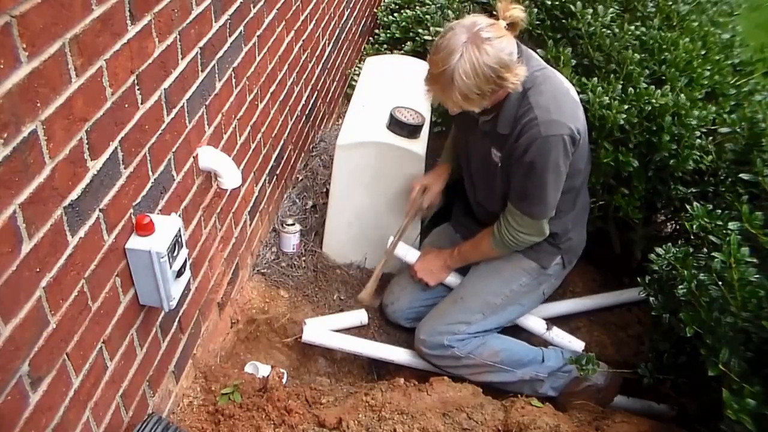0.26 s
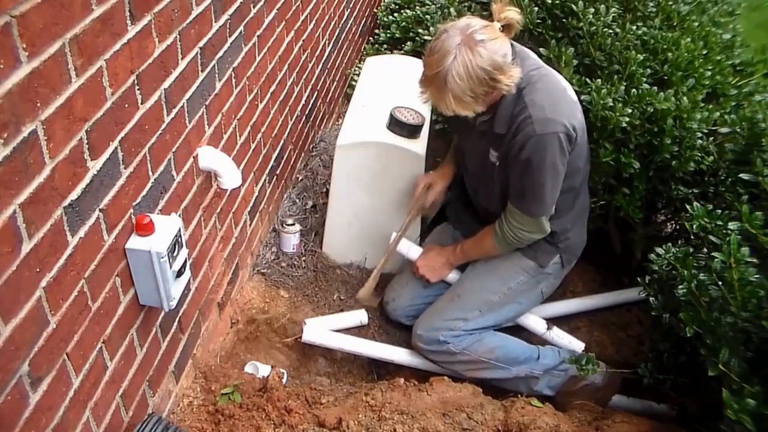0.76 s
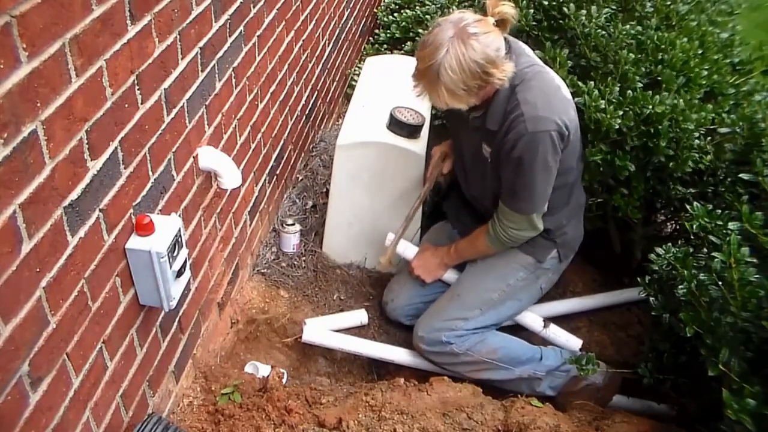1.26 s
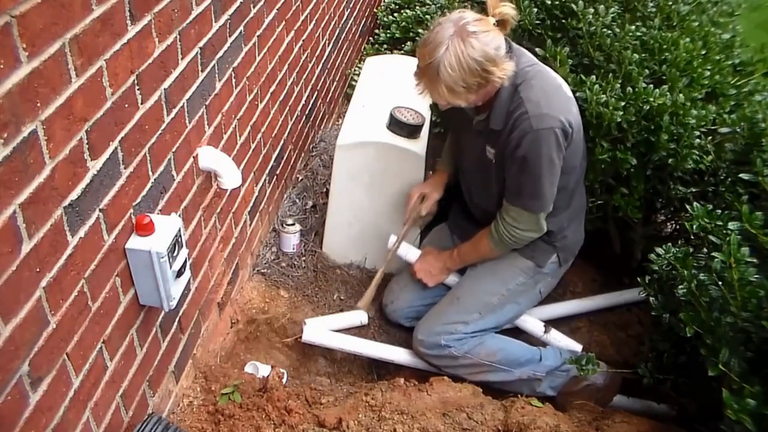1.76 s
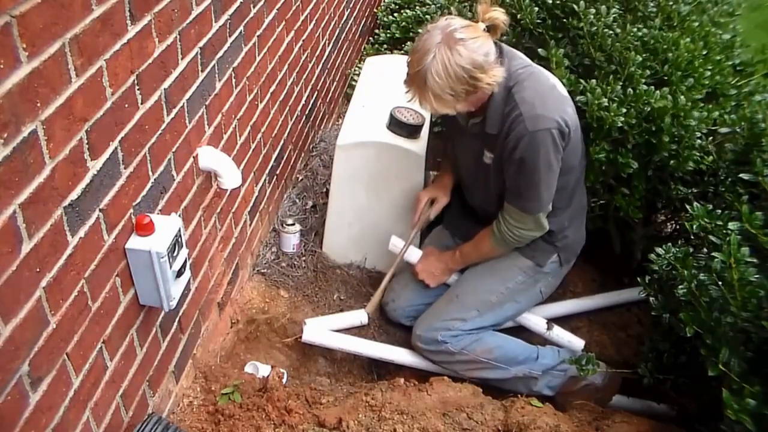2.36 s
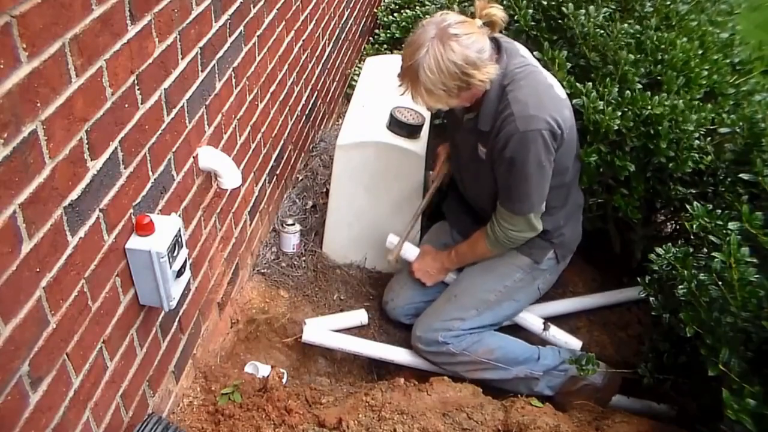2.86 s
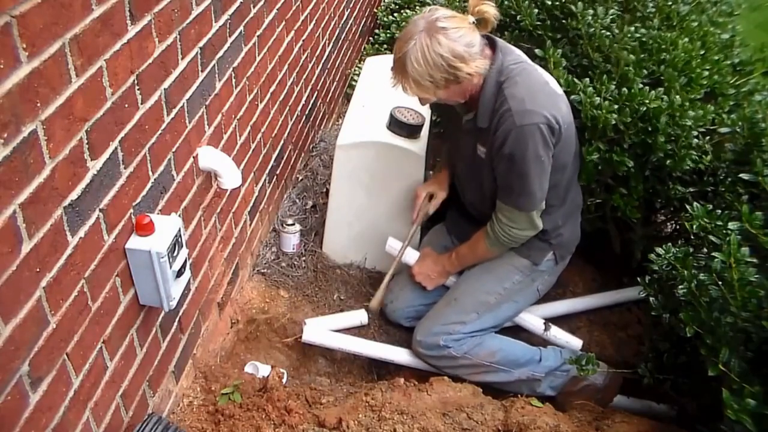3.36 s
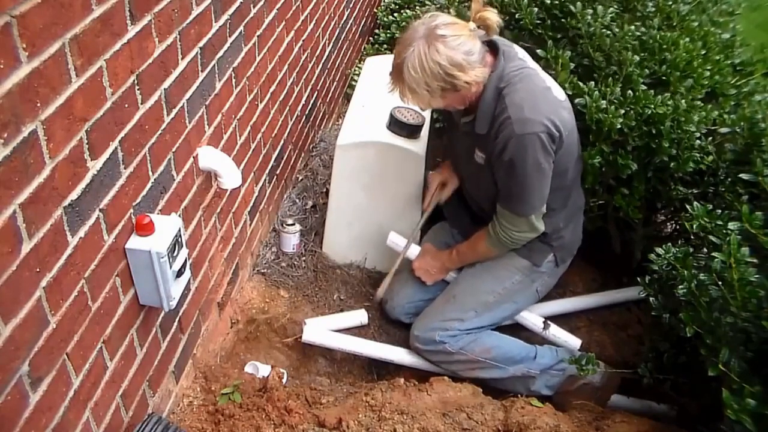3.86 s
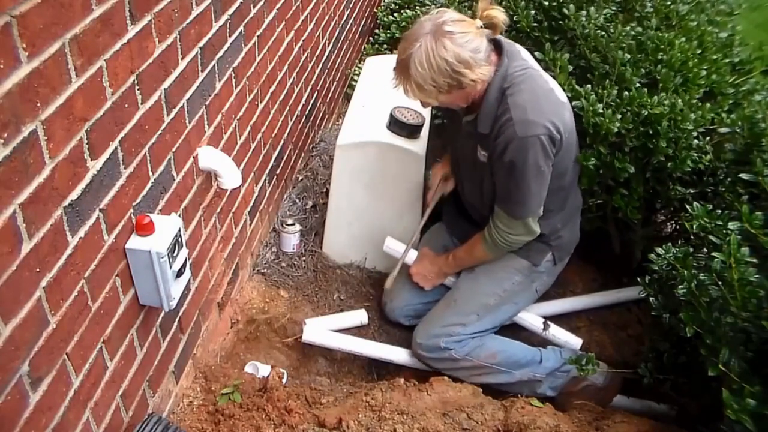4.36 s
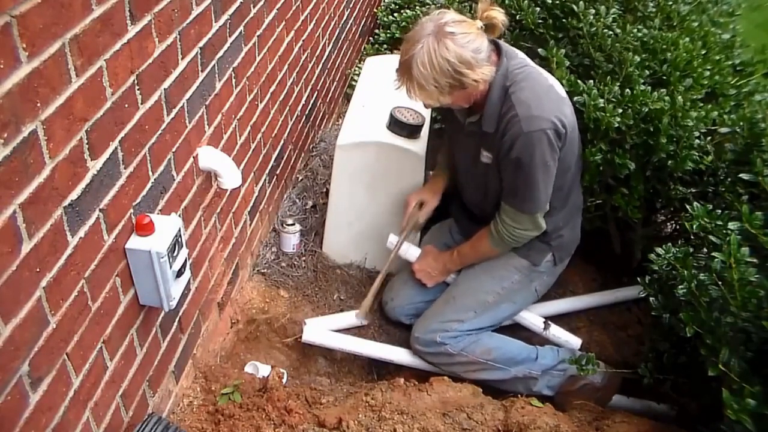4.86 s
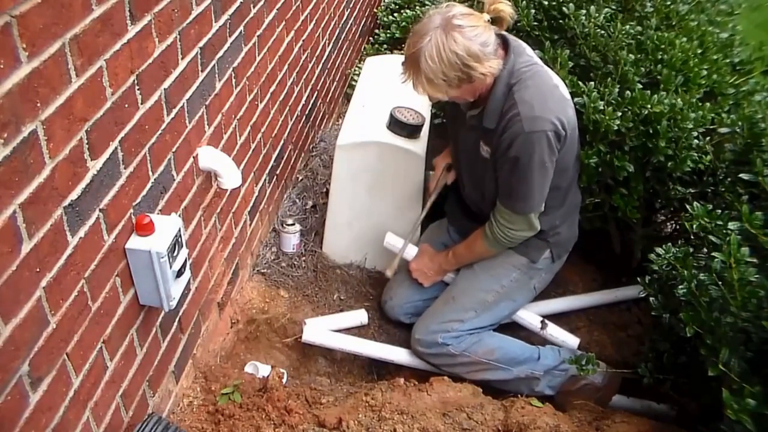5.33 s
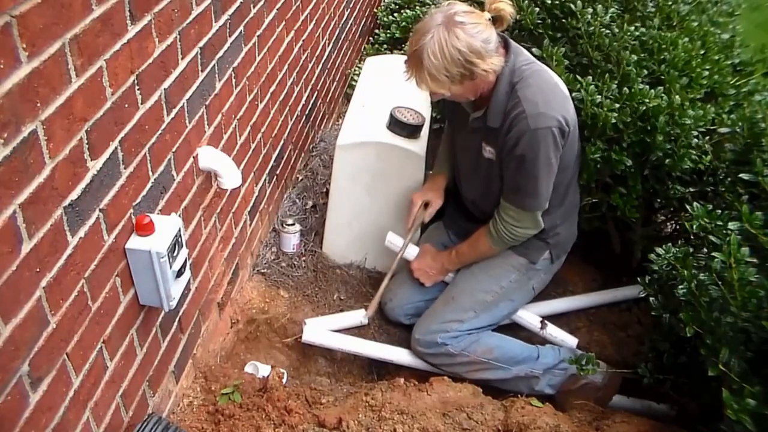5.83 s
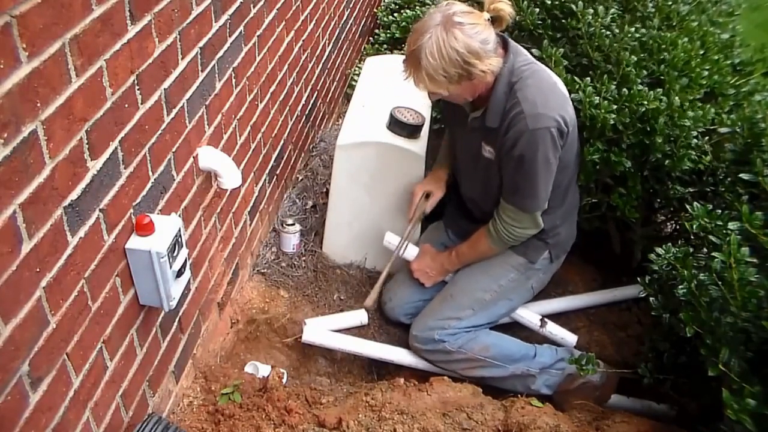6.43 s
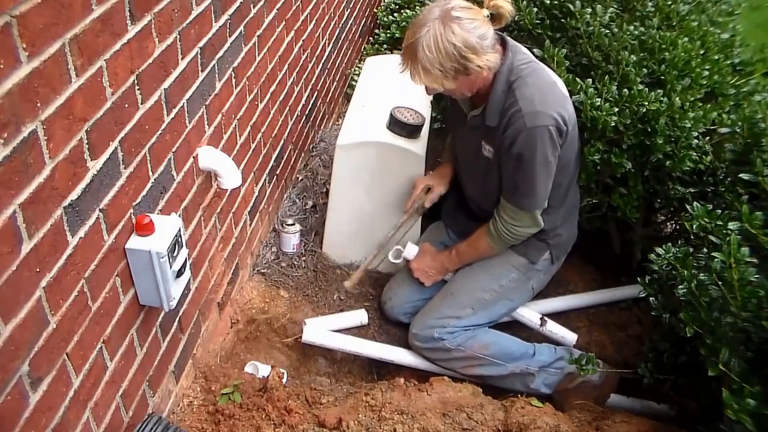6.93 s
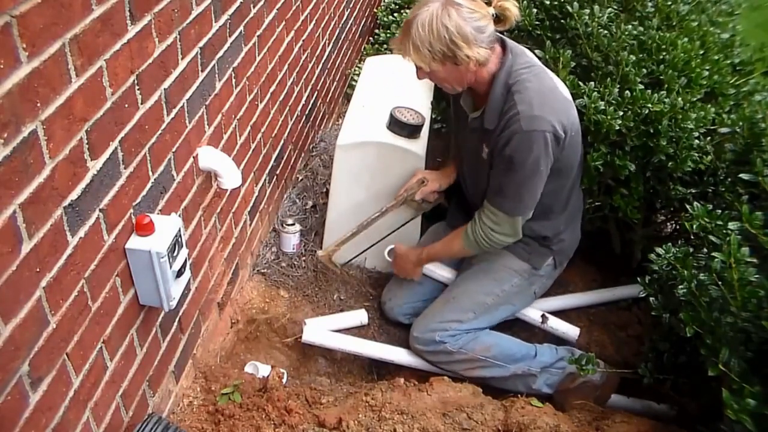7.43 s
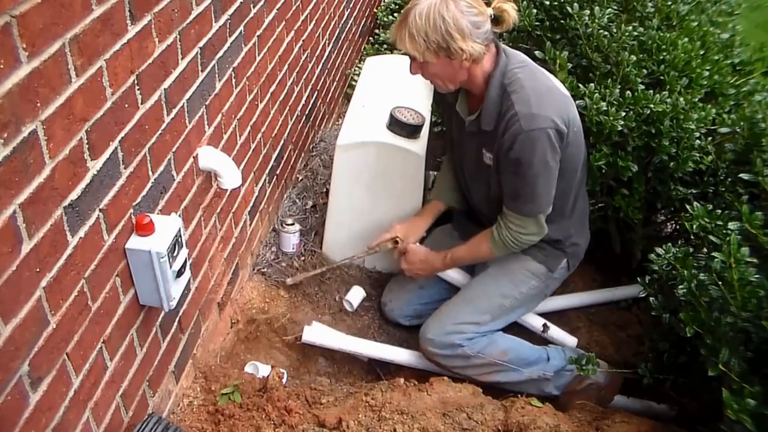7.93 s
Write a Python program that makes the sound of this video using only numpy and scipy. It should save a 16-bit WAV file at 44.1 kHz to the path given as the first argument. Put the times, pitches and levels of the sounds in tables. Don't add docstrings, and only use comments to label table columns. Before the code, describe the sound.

A hacksaw cuts plastic pipe close to the microphone beside a brick wall. Brisk alternating scrapes squeal strongly at first, with loose-blade clacks keeping regular time, then thin into lighter rasps. Near the end the pipe bumps dully, the freed saw jingles, and a short piece hits the ground with a hard crack and brief hollow ring. Wide, quiet garden air holds traffic rumble, crickets and a far caw.

```python
import sys
import numpy as np
from scipy import signal
from scipy.fft import rfft, irfft, next_fast_len
from scipy.io import wavfile
from scipy.ndimage import uniform_filter1d, map_coordinates

SR = 44100
rng = np.random.default_rng(int(sys.argv[2]) if len(sys.argv) > 2 else 0)


def makeup_ratio(level_db):
    decades = np.asarray(level_db, float) / 20
    return 10 ** decades


def waveform_to_disk(signal):
    frames = np.transpose(np.atleast_2d(signal))
    scaled = np.clip(frames, -1, 1) * 32767
    samples = np.round(scaled).astype(np.int16)
    wavfile.write(sys.argv[1], SR, samples)


N = 361179

# (fastest moment [s], time the pressure takes to die [s], rasp [dB], top tooth rate [Hz], tone
# [dB]); at 3.245 s the rate column holds a nearly steady tone near 2 kHz instead
PUSHES = [(0.160, 0.12, -25.5, 1160, -22.5), (0.467, 0.11, -26, 1131, -20.5),
          (0.772, 0.081, -25.5, 1265, -22), (1.070, 0.096, -27, 1229, -18.5),
          (1.384, 0.089, -24.5, 1384, -23.5), (1.698, 0.083, -24.5, 1458, -30.5),
          (2.005, 0.12, -25, 1270, -26), (2.317, 0.089, -22.5, 1344, -26), (2.622, 0.092, -28, 1264, -26),
          (2.943, 0.093, -27.5, 1182, -22.5), (3.245, 0.089, -24, 2065, -35),
          (3.543, 0.092, -33.5, 1253, -42.5), (3.870, 0.092, -27, 1449, -28),
          (4.174, 0.079, -26, 1300, -36.5), (4.487, 0.073, -27.5, 1309, -30),
          (4.790, 0.084, -30.5, 1291, -42.5), (5.109, 0.092, -33, 1252, -34), (5.415, 0.11, -31, 1160, -37),
          (5.724, 0.096, -33, 1160, -39), (6.040, 0.11, -36.5, 1159, -42), (6.333, 0.087, -32, 1043, -37.5),
          (6.620, 0.092, -36, 1145, -51), (7.062, 0.07, -36, 1146, -46.5), (7.182, 0.064, -36, 1018, -38)]
# (fastest moment [s], half length [s], rasp [dB], top tooth rate [Hz], tone [dB]); at 3.415 s a
# nearly steady tone near 2 kHz instead; at 5.815, 6.456 and 6.745 s the tail of a clack
PULLS = [(0.005, 0.093, -37, 995, -39), (0.318, 0.094, -37.5, 1057, -45),
         (0.621, 0.084, -33.5, 1111, -55.5), (0.914, 0.094, -35, 1218, -45.5),
         (1.218, 0.11, -34, 1135, -49), (1.542, 0.087, -33, 1284, -46), (1.85, 0.079, -35, 1293, -48),
         (2.164, 0.073, -32.5, 1241, -47), (2.478, 0.071, -36, 1236, -48), (2.777, 0.11, -41, 1274, -38),
         (3.094, 0.1, -35.5, 1184, -36), (3.415, 0.073, -43, 2057, -51.5), (3.716, 0.2, -42, 1135, -43.5),
         (4.030, 0.1, -37.5, 1207, -51), (4.334, 0.11, -40.5, 1138, -41), (4.632, 0.11, -39, 1160, -44.5),
         (4.95, 0.057, -45.5, 1273, -49), (5.256, 0.11, -41, 1142, -49.5), (5.57, 0.09, -42.5, 1077, -42),
         (5.815, 0.18, -50, 1163, -73), (6.208, 0.076, -46, 1158, -62), (6.456, 0.084, -39.5, 1150, -51),
         (6.745, 0.073, -46, 1147, -69), (6.911, 0.051, -45.5, 1149, -64)]
# (time [s], pipe wall against the blade [dB], arm's time from rest to full speed [s], or, near
# 3.25 and 3.42 s, a long value that holds the tone steady, how early the teeth sing loudest [s])
DEPTH = [(0.0, 1, .058, -0.0057), (1.098, 1.5, .058, -0.028), (1.401, 0.5, 0.069, -0.023),
         (1.701, -1, .075, 0.031), (1.95, -3, .063, 0.00044), (2.4, 2, .058, -0.0031),
         (3.05, 2, 0.066, -0.0058), (3.25, -1.5, .25, 0.0081), (3.42, 5, .25, 0.005),
         (3.55, -7, .07, -0.025), (3.8, 0, 0.081, -0.0057), (4.5, -3, 0.074, 0.015), (5.1, -6, .07, -0.031),
         (5.449, -4, .11, 0.001), (5.902, -11, 0.1, 0.014), (6.3, -6, .08, 0.001), (6.8, -9, .1, -0.0023),
         (7.2, 3, 0.082, 0.0032)]
# (frequency [Hz], density [dB per Hz])
WALL_RASP = [(300, -37), (600, -17), (900, 0), (1300, 0.5), (1900, -9), (2800, 4), (4000, 5), (6000, -29)]
# (frequency [Hz], level [dB], t60 [s])
STEEL = [(1980, -8, .06), (2660, -9, .07), (3390, 0, .1), (3770, -6, .04), (5600, 3, .08), (6180, 0, .12),
         (6420, -3, .065), (7470, -5, .04), (8880, -10, .04), (9810, -5, .1), (9990, -3, .1),
         (10250, -7, .07), (10550, -7, .07), (12760, -12, .05)]
# (time [s], peak [dB], low knock [dB])
CLACKS = [(0.268, -8.5, -16), (0.586, -9.5, -32), (0.8783, -7.5, -35), (1.167, -9, -43), (1.459, -7, -20),
          (1.761, -6, -35), (2.0711, -7.5, -23), (2.202, -22, -6), (2.392, -7, -24), (2.6951, -7.5, -24),
          (3.004, -11.5, -30), (3.315, -5.5, -15.5), (3.6225, -9.5, -38), (3.927, -8.5, -19),
          (4.2368, -8.5, -20), (4.551, -7, -13.5), (4.8622, -8, -19), (5.195, -7, -22.5), (5.5152, -7, -19),
          (5.8146, -7.5, -18.5), (6.106, -8.5, -19), (6.3433, -11.5, -10), (6.45, -7, -15),
          (6.7276, -7.5, -19), (7.0453, -14, -18), (7.5267, -16, -20), (7.886, -13, -7.5)]
# (frequency [Hz], density [dB per Hz])
CRACK = [(1180, -73), (2000, -48), (3280, -7), (4940, -10.5), (5540, -1.5), (7640, -4), (8400, -10.5),
         (10600, -3.5), (14300, -18.5), (16000, -31)]


def unit(x):
    return x / np.sqrt(np.mean(x ** 2) + 1e-20)


def along(points, hz):
    f, v = np.transpose(points)
    return np.interp(np.log(hz + 1), np.log(f + 1), v)


def curves(rows):
    s, *cols = np.transpose(rows)
    return [np.interp(np.arange(N) / SR, s, c) for c in cols]


def wobble(rate):
    knots = rng.standard_normal(int(N * rate / SR) + 4)
    return map_coordinates(knots, [np.arange(N) * rate / SR])


def filtered(x, response):
    m = next_fast_len(x.shape[-1] + 8192)
    return irfft(rfft(x, m) * response(np.fft.rfftfreq(m, 1 / SR)), m)[..., :x.shape[-1]]


def resonances(modes):
    def response(f):
        return sum((-1) ** k * makeup_ratio(db) * 1j * f * w / (c * c - f * f + 1j * f * w)
                   for k, (c, w, db) in enumerate(modes))
    return response


def stereo(pair, alike):
    def turned(hz):
        turn = np.arccos(np.clip(along(alike, hz), -1, 1)) / 2
        return np.array([np.cos(turn), np.sin(turn)])
    mid, side = filtered(pair, turned)
    return np.array([mid + side, mid - side])


def noise(response, patchy_db):
    z = signal.stft(rng.standard_normal((2, N)), nperseg=256)[2]
    field = uniform_filter1d(rng.standard_normal(z.shape[1:]), 3, 0)
    field = uniform_filter1d(field, 5, 1)
    pair = signal.istft(z * makeup_ratio(patchy_db * unit(field)), nperseg=256)[1][:, :N]
    return unit(filtered(pair, response))


def strike(t, modes, spread_db):
    return sum(makeup_ratio(db + rng.normal(0, spread_db) - 60 * t / t60) * np.sin(2 * np.pi * hz * t)
               for hz, db, t60 in modes)


def arc(u, rise, fall):
    return np.abs(np.cos(np.pi / 2 * np.clip(np.where(u < 0, u / rise, u / fall), -1, 1)))


def pressure():
    early_s, rise_s, push_peaked = 0.01, 0.063, 1.68
    lean, pull_peaked, pull_wall_db = 0.92, 1.6, -1
    blade, wall, t = np.zeros(N), np.zeros(N), np.arange(N) / SR
    at, depth_db, *_ = np.transpose(DEPTH)
    pushes = [(s - early_s, rise_s, fall + early_s, db, push_peaked, 0) for s, fall, db, *_ in PUSHES]
    pulls = [(s, half * lean, half / lean, db, pull_peaked, pull_wall_db) for s, half, db, *_ in PULLS]
    for s, rise, fall, rasp_db, peaked, touch_db in pushes + pulls:
        on = slice(max(0, round((s - rise) * SR)), round((s + fall) * SR))
        press = arc(t[on] - s, rise, fall) ** peaked
        blade[on] += makeup_ratio(rasp_db) * press
        wall[on] += makeup_ratio(rasp_db + touch_db + np.interp(s, at, depth_db)) * press
    return blade, wall


def teeth():
    # (time [s], half width [s], level over the stroke's tone [dB])
    gripping = [(0.15, 0.014, 3.5), (.172, 0.013, -28), (0.199, 0.017, -3), (0.46, 0.015, 1.5),
                (.483, 0.013, -6), (.757, 0.017, 4.5), (.78, 0.01, 2.5), (1.061, 0.012, -0.5),
                (1.088, 0.033, -18), (1.36, 0.021, -1.5), (1.38, 0.0061, 2), (1.398, 0.0059, -13),
                (1.675, 0.024, 2), (1.695, .01, -5), (1.728, 0.009, -5), (1.995, 0.0091, 6.5),
                (2.013, 0.011, 5), (2.299, 0.007, -4), (2.314, 0.0071, -4), (2.336, 0.0095, 2),
                (2.613, 0.0084, 10), (2.632, 0.0072, 5), (2.933, 0.0082, 5.5), (2.953, 0.017, -2.5),
                (3.568, 0.013, 7.5), (3.415, .018, 3), (.312, .022, 3), (.625, .02, 12), (.91, 0.013, 3),
                (5.263, .016, 4), (3.706, 0.019, -7), (3.867, .009, 6), (4.156, 0.0054, 12),
                (4.175, 0.0052, -6), (4.197, .008, 1), (4.474, 0.013, -0.5), (4.504, 0.0072, -7),
                (4.62, .01, 0), (4.779, 0.0056, 1), (4.797, .012, -2), (4.948, 0.0081, 3), (5.097, .01, 1),
                (5.426, .013, -4), (5.575, .008, -2), (5.729, 0.012, 3.5), (6.026, 0.0064, 1),
                (6.044, 0.0074, -4)]
    # (time [s], slowing time over speeding time [ratio])
    braking = [(0, 1.2), (1.1, 1.15), (1.384, .88), (1.698, 1.8), (2.0, 1.05), (2.62, 1.15), (2.943, 1.03),
               (3.9, 1.1), (7.2, 1.15)]
    push_line_db = 10.5
    pull_line_db, pull_edge_db = 9, 6
    pull_early_s, pull_slack, pull_slowing = 0.006, 1.05, 1.05
    rate, tone, bite, t = np.zeros(N), np.zeros(N), np.ones(N), np.arange(N) / SR
    at, _, sweep, early = np.transpose(DEPTH)
    pushes = [(*p, 1, push_line_db, np.interp(p[0], *np.transpose(braking)), 0) for p in PUSHES]
    pulls = [(s - pull_early_s, *p, pull_slack, pull_line_db, pull_slowing, pull_edge_db)
             for s, *p in PULLS]
    for s, _, _, tooth_hz, tone_db, slack, line_db, slowing, edge_db in sorted(pushes + pulls):
        on = slice(max(0, round((s - .07) * SR)), round((s + .07) * SR))
        rise = slack * np.interp(s, at, sweep)
        speed = arc(t[on] - s, rise, slowing * rise)
        rate[on] = tooth_hz * speed
        bite[on] = makeup_ratio(edge_db)
        grips = [g for g in gripping if abs(g[0] - s) < .05]
        if not grips:
            grips = [(s - np.interp(s, at, early), .021, 0)]
        swell = sum(makeup_ratio(db) * np.exp(-((t[on] - when) / wide) ** 2) for when, wide, db in grips)
        line = makeup_ratio(line_db) * .1 * np.sqrt(speed * arc(t[on] - s, .07, .07))
        tone[on] = makeup_ratio(tone_db) * (swell + line)
    return rate, tone, bite


def saw():
    # (frequency [Hz], density [dB per Hz])
    blade_rasp = [(880, -30.5), (1500, 1.5), (1700, -12), (3370, -6.5), (4010, -9.5), (4460, -7.5),
                  (4860, -3), (9820, -7), (13900, -12.5), (15000, -56)]
    # (frequency [Hz], width [Hz], level [dB])
    pipe_modes = [(1160, 215, 1), (1380, 73, -14), (1800, 237, 11.5), (2920, 100, -45)]
    # (frequency [Hz], width [Hz], level [dB])
    bore_modes = [(1790, 100, 2.5), (2250, 180, -6.5), (2700, 146, 2), (3150, 43, 3), (3420, 130, -6)]
    overtones_db = [-4.5, -7.5, -11]
    pipe, bore = resonances(pipe_modes), resonances(bore_modes)
    steel = resonances([(c, 70, 0) for c, *_ in STEEL])

    rate, tone, bite = teeth()
    blade_gain, wall_gain = pressure()
    travel = 2 * np.pi * np.cumsum(rate) / SR
    phase = travel + .3 * wobble(300)
    lumps = makeup_ratio(1.5 * wobble(150))
    sing = makeup_ratio(9.5) * filtered(tone * lumps * np.sin(phase),
                               lambda f: (.5 + .5 * pipe(f)) * (f / (f - 700j)) ** 3)
    edge = sum(makeup_ratio(db + 3 * wobble(70)) * np.sin(k * travel + .45 * wobble(250))
               for k, db in enumerate(overtones_db, 2))
    sing += filtered(edge * bite * np.sqrt(tone * wall_gain), lambda f: 0.37 + np.abs(bore(f)))

    grit = (1 + .6 * np.cos(phase)) * makeup_ratio(1.3 * wobble(60) + 1.6 * wobble(900))
    blade = noise(lambda f: makeup_ratio(along(blade_rasp, f)) * np.abs(1 + .9 * steel(f)), patchy_db=2.5)
    wall = noise(lambda f: makeup_ratio(along(WALL_RASP, f)) * np.abs(0.48 + pipe(f)) * (1 + 0.31 * np.abs(bore(f))),
                 patchy_db=2.5)
    rasp = grit * (makeup_ratio(-1.0) * blade_gain * blade + makeup_ratio(-3.5) * wall_gain * wall)
    return filtered(rasp, lambda f: (f / (f - 170j)) ** 2) + sing * [[1], [-.3]]


def yard(x):
    # (frequency [Hz], t60 [s])
    decay = [(300, 0.45), (2000, 0.21), (10000, 0.38)]
    hz, t, z = signal.stft(rng.standard_normal((2, SR // 3)), SR, nperseg=256)
    tail = signal.istft(z * makeup_ratio(-60 * t / along(decay, hz)[:, None]), SR, nperseg=256)[1]
    late = np.pad(x, (300, 0))[None]
    return signal.fftconvolve(late, tail / np.linalg.norm(tail[0]), axes=1)[:, :N]


def ridden_db():
    # (time [s], level [dB])
    slow_gain = [(0.0, -52.5), (1.2, -53), (1.5, -54.5), (2.3, -52), (3.1, -53.5), (4.2, -54), (5.4, -54),
                 (6.4, -54), (7.2, -52.5), (7.9, -51.5), (8.19, -55)]
    # (time [s], depth [dB], time to come back [s])
    dips = [(2.05, 5, 0.048), (2.38, 4.5, .08), (2.64, 13, 0.17), (3.29, 9, 0.66), (4.53, 2, 0.07),
            (4.85, 10, 0.13), (5.83, 13, 0.12), (6.75, 6, 0.18), (7.96, 3.5, 0.98)]
    down_s = 0.086
    t = np.arange(N) / SR
    return curves(slow_gain)[0] - sum(db * np.interp(t, [s, s + down_s, s + down_s + back], [0, 1, 0])
                                      for s, db, back in dips)


def crickets():
    # (frequency [Hz], width [Hz], level [dB], swells [per s])
    far_crickets = [(5290, 250, 1, 11), (5480, 300, -5, 21), (5620, 250, -7, 8)]
    white = rng.standard_normal((2, N))
    far = 0
    for hz, width, db, pace in far_crickets:
        band = unit(filtered(white, lambda f: resonances([(hz, width, 0)])(f) ** 2))
        far = far + makeup_ratio(db + 3 * wobble(2 * pace)) * band
    chirp_s, every_s, long_s, chirp_hz = 7.257, .0933, .011, 5760
    u = (np.arange(N) / SR - chirp_s + every_s / 2) % every_s - every_s / 2
    chirp = np.exp(-(u / long_s) ** 2) * np.sin(2 * np.pi * (chirp_hz * u - 2500 * u ** 2))
    return far + makeup_ratio(5 + 2 * wobble(10)) * chirp * [[1], [.5]]


def engine():
    t = np.arange(N) / SR

    def drone(hz, wide):
        return unit(filtered(rng.standard_normal((2, N)), lambda f: resonances([(hz, wide, 0)])(f) ** 2))
    leaving = makeup_ratio(-50.5 - 5 * t) * drone(170, 60)
    coming = makeup_ratio(-47.5) * np.clip((t - 7.24) / 0.19, 0, 1) * drone(100.8, 16)
    return coming + leaving


def garden():
    # (frequency [Hz], density [dB per Hz])
    air_colour = [(70, -27), (120, -3), (400, -3), (900, -4), (1500, -4.5), (2200, -10.5), (3300, -8),
                  (4500, -15.5), (7000, -18.5), (10000, -20), (14000, -24)]
    # (frequency [Hz], density [dB per Hz])
    traffic_colour = [(15, -29), (24, -1.5), (32, 5.5), (45, -5), (80, -5.5), (98, -5), (115, -9.5),
                      (160, -17), (240, -54)]
    # (time [s], level over the air [dB])
    passing = [(0.0, -1), (2.0, -1.5), (3.4, 2.5), (4.3, 0.5), (5.4, 2), (6.4, 1), (7.2, 1), (8.19, 1.5)]
    # (time [s], level [dB])
    chorus = [(0, -2), (6.4, -10), (7.1, -5), (7.3, 0.5), (8.19, -2)]
    # (frequency [Hz], left-right likeness [-1 to 1])
    far_alike = [(30, .3), (60, 0.8), (240, 0.36), (950, 0.83), (3770, 0.52), (15000, 0.04)]
    air_db = ridden_db()
    traffic_db = air_db + curves(passing)[0]
    air = noise(lambda f: makeup_ratio(along(air_colour, f)), patchy_db=1.5)
    traffic = unit(filtered(rng.standard_normal((2, N)), lambda f: makeup_ratio(along(traffic_colour, f))))
    mix = makeup_ratio(air_db + 6) * air + makeup_ratio(traffic_db + 5.5) * traffic
    mix += makeup_ratio(air_db + curves(chorus)[0]) * crickets() + engine()
    return stereo(mix, far_alike)


def snags():
    # (time [s], peak [dB], ringing frequency
    # [Hz])
    caught = [(0.138, -16, 1790), (0.443, -15.5, 1750), (0.536, -34, 1120), (0.803, -23, 1850),
              (1.044, -13.5, 1790), (1.352, -15.5, 1790), (2.2011, -18, 3350), (2.201, -22.5, 2599),
              (2.603, -31, 2250), (2.964, -12.5, 1859), (3.211, -17.5, 3420), (3.495, -32, 3372),
              (3.522, -30.5, 3590), (0.148, -16, 3150), (0.454, -26, 3200), (3.549, -27, 2436),
              (3.88, -28, 2540), (3.836, -28, 3460), (3.845, -21, 2000), (4.11, -29, 3440),
              (5.11, -25.5, 3430), (5.881, -44, 1828), (1.344, -23, 2890), (1.508, -26.5, 2700),
              (2.698, -26, 3394), (2.329, -24, 1141), (3.86, -37, 1440), (4.151, -18, 1179),
              (4.153, -31, 2847), (4.429, -28, 3470), (4.460, -26, 3580), (4.501, -24, 1170),
              (5.094, -22, 1160), (5.364, -29, 1137), (5.366, -35, 3400), (5.422, -24, 1453),
              (5.515, -28, 2020), (5.544, -36, 1950), (5.550, -38, 2998), (5.684, -28, 1109),
              (5.720, -26, 3450), (5.764, -33, 1051), (6.021, -43, 2003), (6.284, -28, 2830),
              (6.298, -31, 3516), (6.343, -33, 3394), (6.580, -31, 2880), (6.616, -34, 3236),
              (7.025, -29, 1760), (7.033, -23, 1800), (7.043, -22, 2780), (7.060, -28, 1149),
              (7.144, -27, 1109), (7.170, -33, 3870), (7.187, -24, 1120), (7.202, -28, 1460),
              (7.205, -39, 2700), (7.269, -40, 1613), (7.890, -26.5, 1480)]
    t60_s, wide, splash = 0.055, 0.04, 0.18
    out, t = np.zeros((2, N + SR)), np.arange(SR // 16) / SR
    shape = (1 - np.exp(-t / 0.00052)) * makeup_ratio(-60 * t / t60_s)
    chips = resonances([(3200, 5000, -7)])
    for s, db, hz in caught:
        mode = resonances([(hz, wide * hz, 0)])
        chatter = unit(filtered(rng.standard_normal((2, len(t))), lambda f: mode(f) + splash * chips(f) ** 2))
        out[:, round(s * SR):][:, :len(t)] += makeup_ratio(db) * shape * chatter
    return out[:, :N]


def lead_ins():
    t = np.arange(N) / SR
    swell = sum(makeup_ratio(db - 32) * (t < s) * np.exp(np.minimum(t - s, 0) / 0.014) for s, db, _ in CLACKS)
    return swell * noise(lambda f: makeup_ratio(along(CRACK, f)), patchy_db=2.0)


def clacks():
    out, t = np.zeros((2, N + SR)), np.arange(SR // 6) / SR
    shape = 0.49 * makeup_ratio(-60 * t / 0.0055) + makeup_ratio(-60 * t / 0.017) + 0.073 * makeup_ratio(-60 * t / 0.095)
    shape *= 1 - np.exp(-t / 0.00066)
    sharp = 0.26 * makeup_ratio(-60 * t / 0.016) + 0.86 * makeup_ratio(-60 * t / 0.015) + 0.084 * makeup_ratio(-60 * t / 0.14)
    sharp *= 1 - np.exp(-t / 0.0014)

    def dull(f):
        return 1 / (1 + (f / 4340) ** 4)
    for s, db, knock_db in CLACKS:
        white = rng.standard_normal((2, 2, len(t)))
        low = filtered(white[0], lambda f: makeup_ratio(along(CRACK, f)) * dull(f))
        high = filtered(white[0], lambda f: makeup_ratio(along(CRACK, f)) * (1 - dull(f)))
        crack = 1.45 * shape * low + sharp * high
        knock = shape * unit(filtered(white[1], lambda f: makeup_ratio(along(WALL_RASP, f)) * (f < 2600)))
        flutter = makeup_ratio(3 * np.sin(t * rng.uniform(300, 900)))
        ring = makeup_ratio(-27) * (1 - np.exp(-t / .001)) * strike(t, STEEL, spread_db=3.5) * flutter * [[1], [.5]]
        blow = crack / np.abs(crack[0]).max() + ring + makeup_ratio(knock_db - 4.0) * knock
        out[:, round(s * SR):][:, :len(t)] += makeup_ratio(db + 1.0) * blow
    return out[:, :N]


def crow():
    # (time [s], second harmonic [Hz], its level [dB])
    caws = [
        [(6.5, 1161, -64), (6.526, 1458, -57), (6.554, 1509, -55), (6.636, 1448, -58), (6.652, 1366, -51),
         (6.7, 1210, -57)],
        [(7.555, 1290, -53), (7.569, 1303, -52), (7.607, 1562, -50), (7.677, 1470, -47.5), (7.731, 1300, -48),
         (7.77, 1225, -56), (7.81, 1180, -61)],
    ]
    # (frequency [Hz], level [dB])
    throat = [(600, -24), (1100, -4), (1450, 1.5), (1900, -14), (2400, -18), (3200, -13)]
    out, t = np.zeros(N), np.arange(N) / SR
    for call in caws:
        hz, db = curves(call)
        fade = np.clip(np.minimum(t - call[0][0], call[-1][0] - t) / 0.0073, 0, 1)
        phase = np.pi * np.cumsum(hz) / SR + .22 * wobble(200)
        voice = sum(makeup_ratio(along(throat, k * hz / 2)) * np.sin(k * phase) for k in range(1, 4))
        hoarse = makeup_ratio(3 * wobble(70))
        out += fade * makeup_ratio(db + 9.5) * hoarse * voice
    return out


def offcut():
    # (time [s], frequency [Hz], level [dB], t60 [s])
    thumps = [(7.203, 188.4, -27, 0.17), (7.209, 136.8, -28.5, 0.071), (7.211, 255, -32, .08),
              (7.231, 114, -17, 0.037), (7.262, 95.4, -33, 0.11)]
    # (time [s], crack [dB], ring [dB])
    landings = [
        (7.851, -40, -36),
        (7.9738, -11.5, -28),
        (7.9808, -30, -6.5),
        (7.9885, -25, -34),
    ]
    # (frequency [Hz], level [dB], t60 [s])
    column = [(1620, 0, .05), (2000, -11, .02), (2700, -13, .015)]
    # (frequency [Hz], level [dB], t60 [s])
    snap_modes = [(1800, 1, 0.014), (2220, 7, 0.011), (2640, 2.5, 0.008), (4050, 6, 0.007),
                  (5500, 3, 0.011), (6900, -18, 0.012), (8950, -5, 0.0076)]
    out, t = np.zeros(N + SR), np.arange(SR // 5) / SR
    for s, hz, db, t60 in thumps:
        bump = (1 - np.exp(-t / 0.0034)) * strike(t, [(hz, db, t60)], spread_db=0.5)
        out[round(s * SR):][:len(t)] += bump
    settle = .1 + .9 / (1 + (t / .0075) ** 6)
    soil = resonances([(3300, 6000, 1.5)])
    scatter = .75 * makeup_ratio(-60 * t / .01) + .1 * makeup_ratio(-60 * t / .09)
    for s, crack_db, ring_db in landings:
        ring = (1 - np.exp(-t / .0008)) * settle * strike(t, column, spread_db=0)
        grit = scatter * filtered(rng.standard_normal(len(t)), lambda f: soil(f) ** 2)
        snap = 0.68 * (1 - np.exp(-t / 0.00013)) * strike(t, snap_modes, spread_db=1.0)
        out[round(s * SR):][:len(t)] += makeup_ratio(crack_db) * (snap + grit) + makeup_ratio(ring_db) * ring
    return out[:N]


def rattles():
    # (time [s], peak [dB])
    touches = [(7.3893, -30), (7.4045, -41), (7.4325, -29.5), (7.439, -26), (7.4555, -32), (7.462, -25),
               (7.514, -33), (7.528, -16.5), (7.5715, -28), (7.577, -30), (7.6066, -31), (7.6335, -35),
               (7.8887, -19.5), (7.908, -30), (7.920, -34), (7.9294, -35), (7.944, -31), (8.089, -45)]
    # (frequency [Hz], level [dB], t60 [s])
    loose = [(2910, -7, .05), (3120, -2, .03), (3420, 0, .025), (3650, -6, .015), (4650, -7, .02),
             (4930, -6, .025), (6400, -11, .02), (7080, -9, .025)]
    out, t = np.zeros(N + SR), np.arange(SR // 8) / SR
    for s, db in touches:
        tick = filtered(rng.standard_normal(len(t)), resonances([(4500, 5000, 3)]))
        tick *= .5 * makeup_ratio(-60 * t / .012)
        ring = strike(t, loose, spread_db=3)
        out[round(s * SR):][:len(t)] += makeup_ratio(db - 5) * (1 - np.exp(-t / .0012)) * (ring + tick)
    return out[:N] * makeup_ratio(3 * wobble(250))


def scene():
    # (frequency [Hz], left-right likeness [-1 to 1])
    near_alike = [(60, 0.68), (300, 0.37), (600, 0.66), (1200, 1), (2500, 1), (4500, 0.91), (8000, 0.27),
                  (14000, 0.37)]
    work = saw() + snags() + lead_ins() + clacks() + (offcut() + rattles()) * [[1], [.5]]
    near = stereo(work + makeup_ratio(-20) * yard(work[0]), near_alike)
    bird = crow()
    return near * makeup_ratio([[-.2], [.2]]) + garden() + bird + makeup_ratio(-20) * yard(bird)


def band_limit(x):
    return signal.sosfilt(signal.butter(12, 16470, fs=SR, output="sos"), x)


def record(dry):
    # (frequency [Hz], level [dB])
    mic = [(20, -4), (13500, -0.5), (14400, -2), (15200, -26), (16300, -16)]
    hiss = makeup_ratio(-63) * rng.standard_normal(dry.shape)
    mix = filtered(dry + hiss, lambda hz: makeup_ratio(along(mic, hz)))
    return band_limit(mix)


dry = scene()
out = record(dry)
waveform_to_disk(out)
```